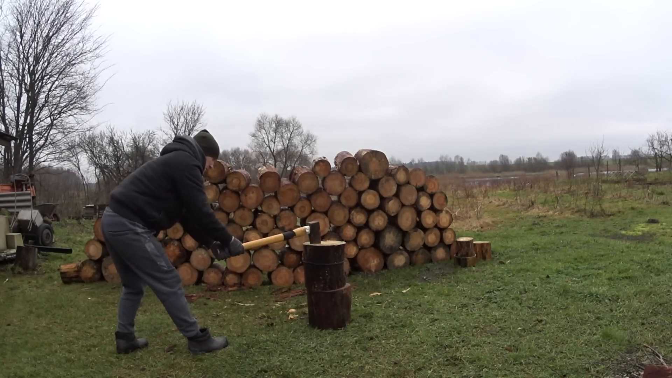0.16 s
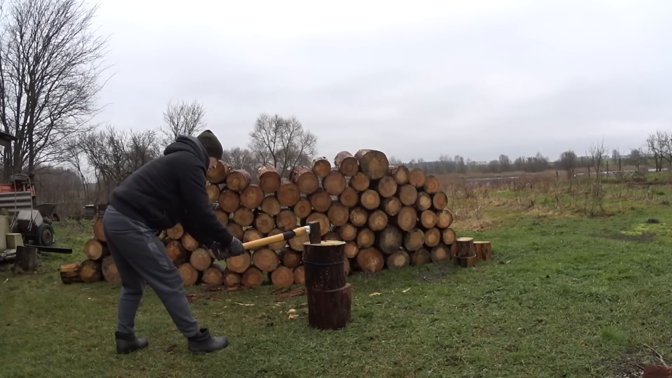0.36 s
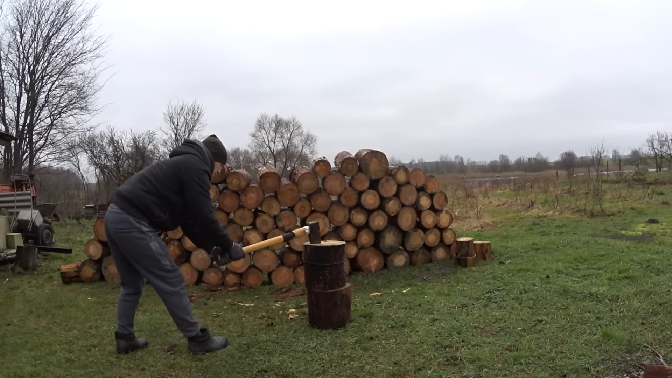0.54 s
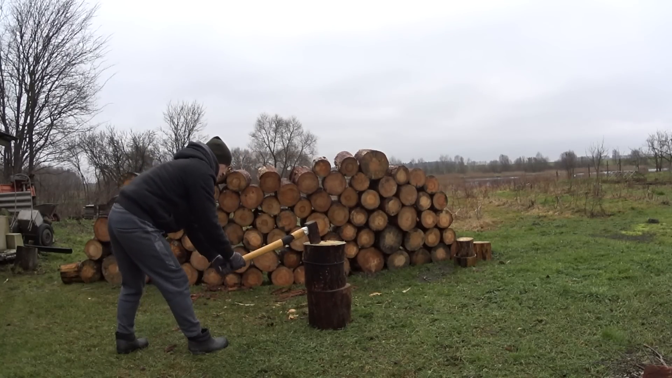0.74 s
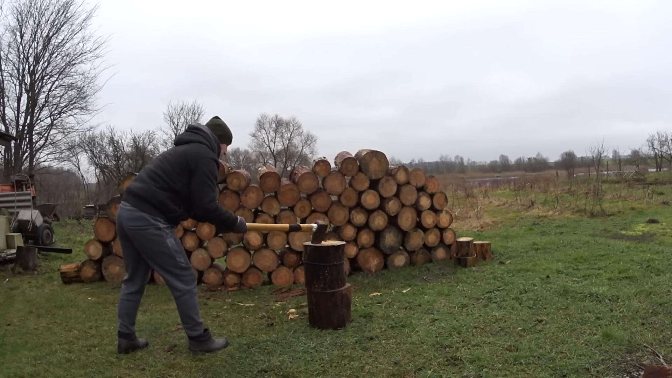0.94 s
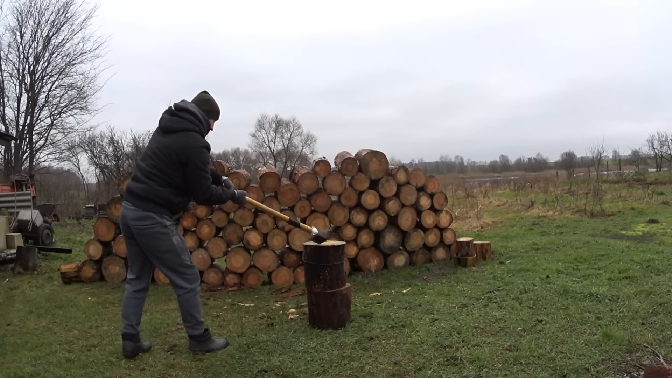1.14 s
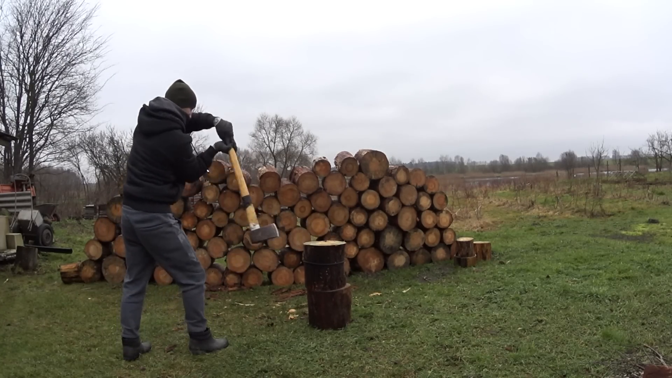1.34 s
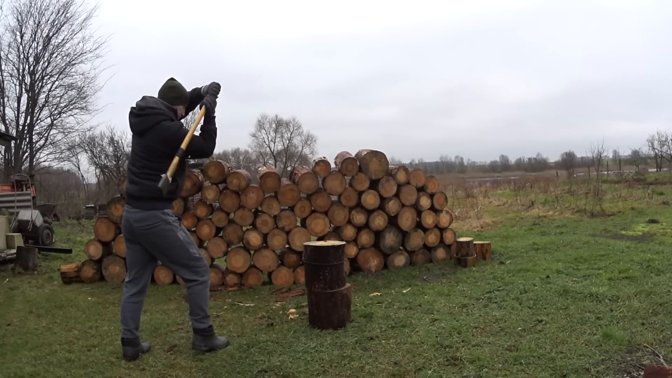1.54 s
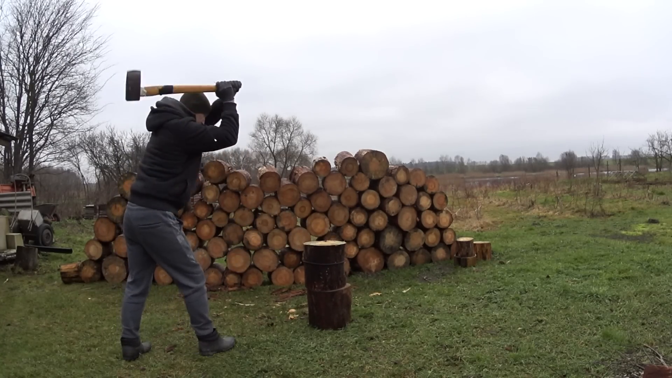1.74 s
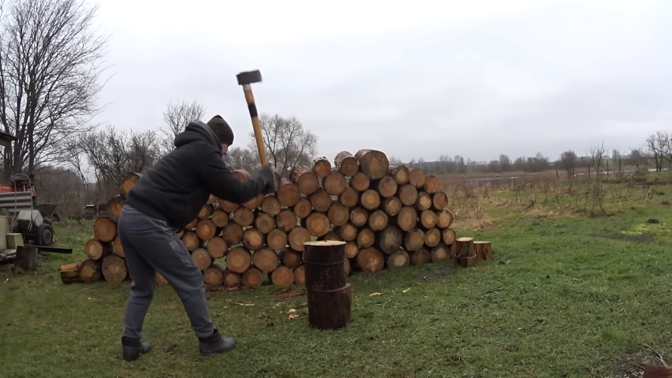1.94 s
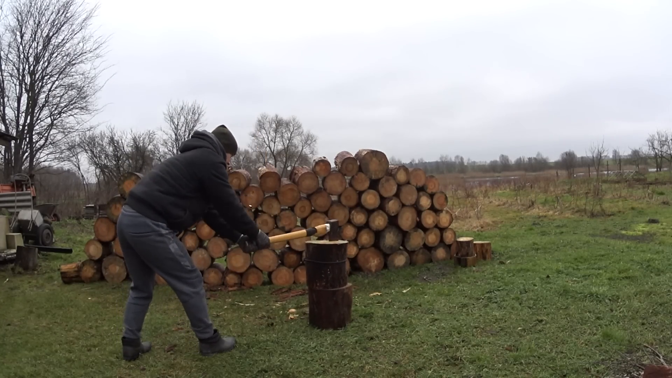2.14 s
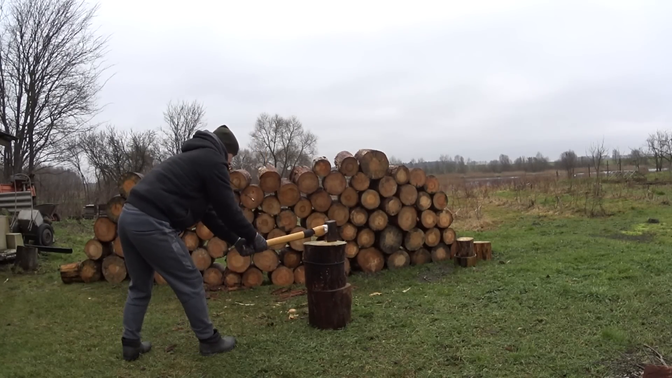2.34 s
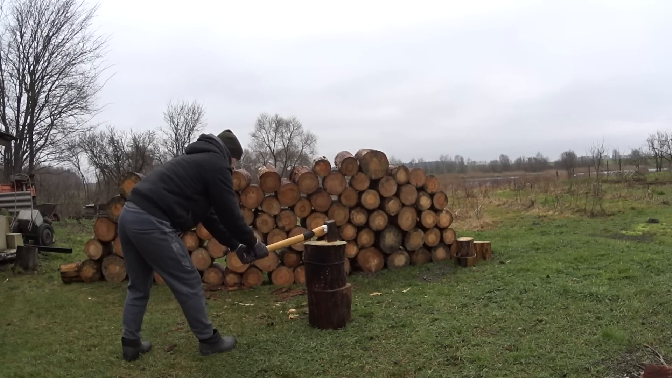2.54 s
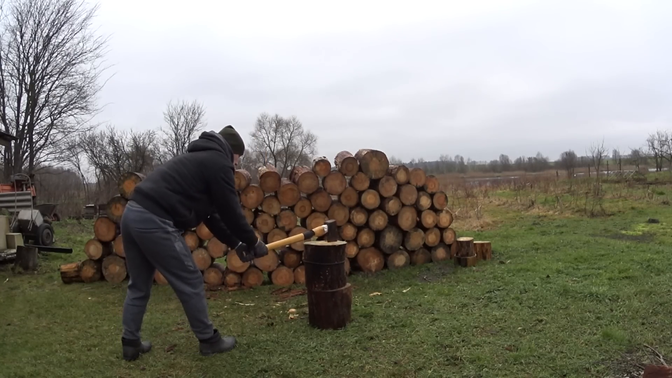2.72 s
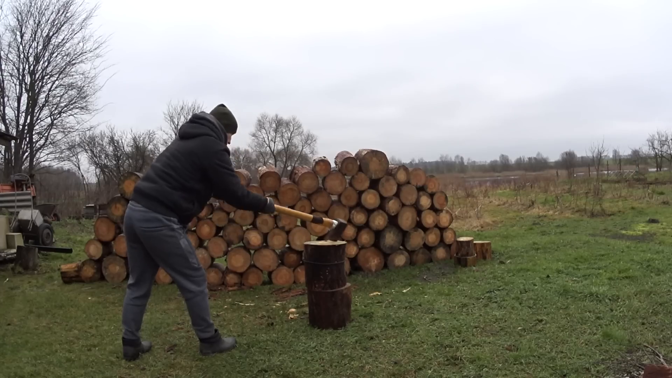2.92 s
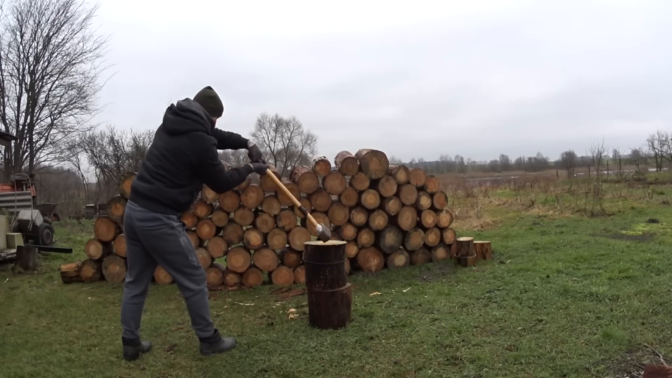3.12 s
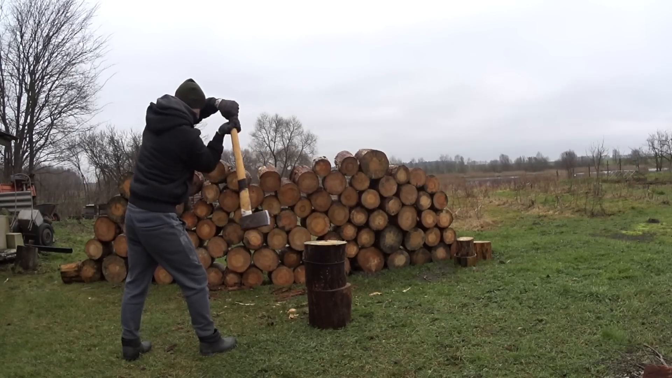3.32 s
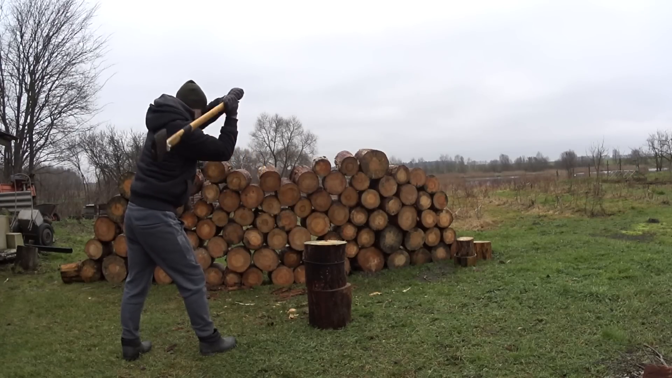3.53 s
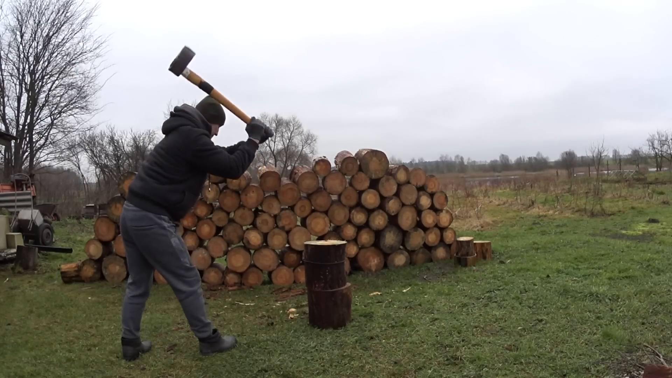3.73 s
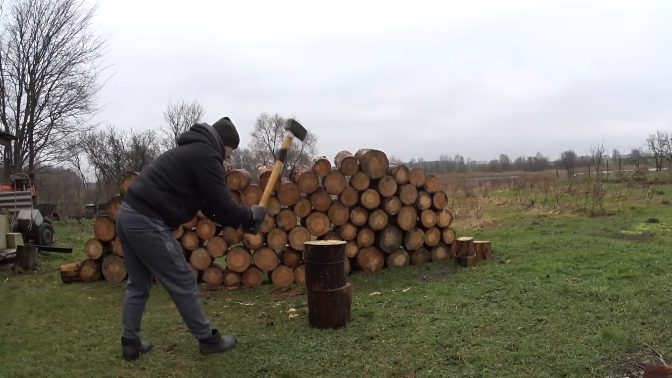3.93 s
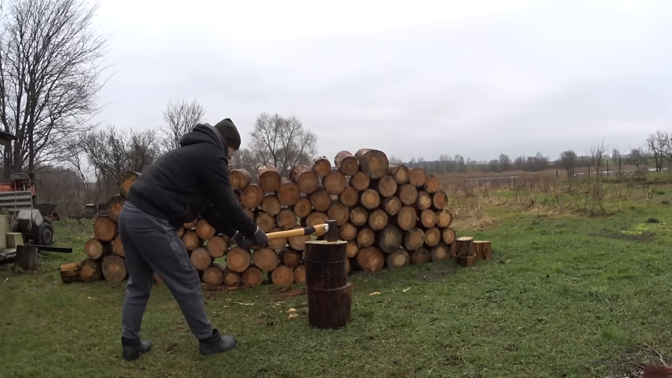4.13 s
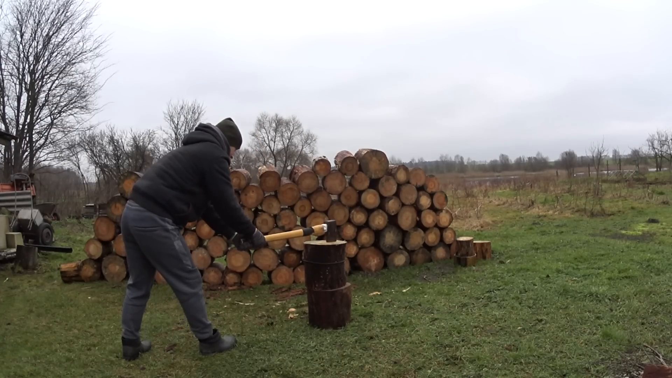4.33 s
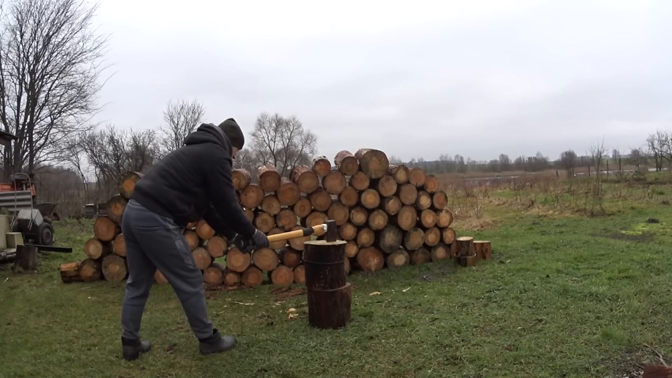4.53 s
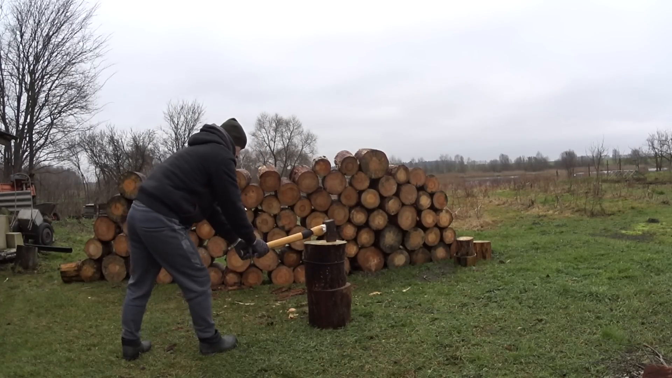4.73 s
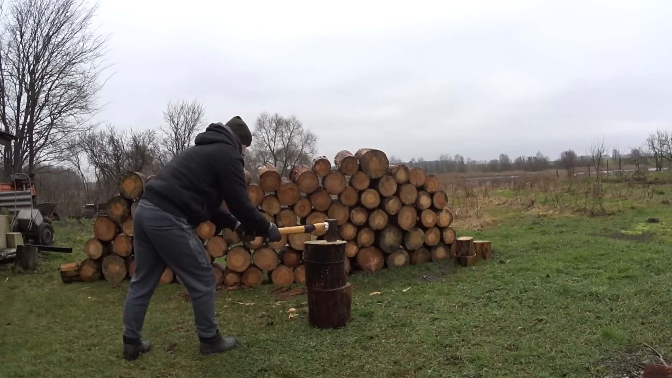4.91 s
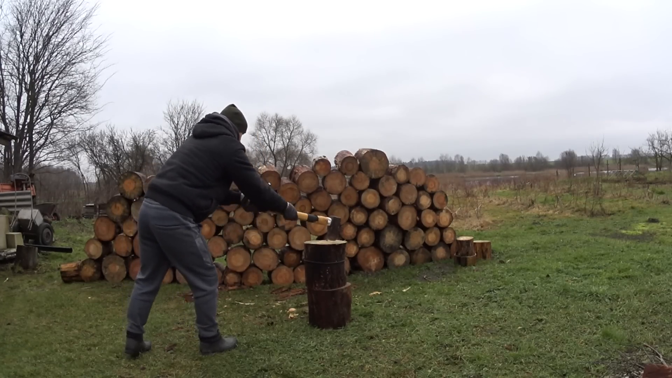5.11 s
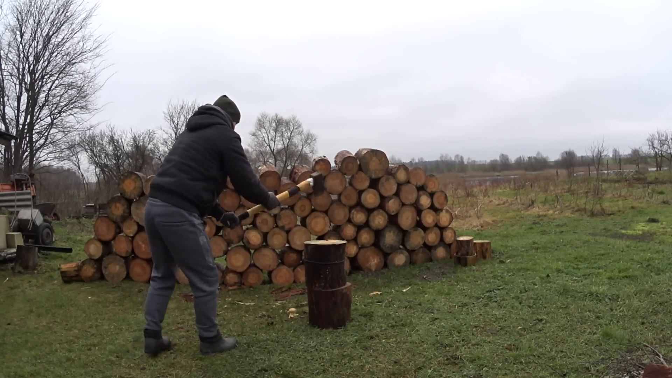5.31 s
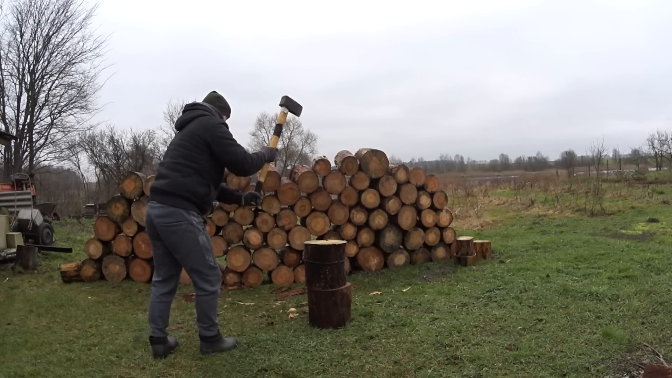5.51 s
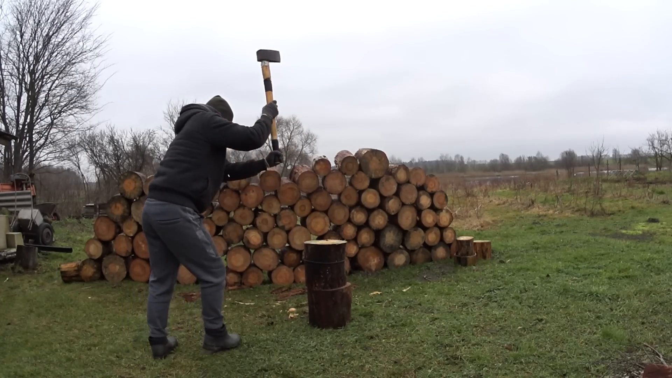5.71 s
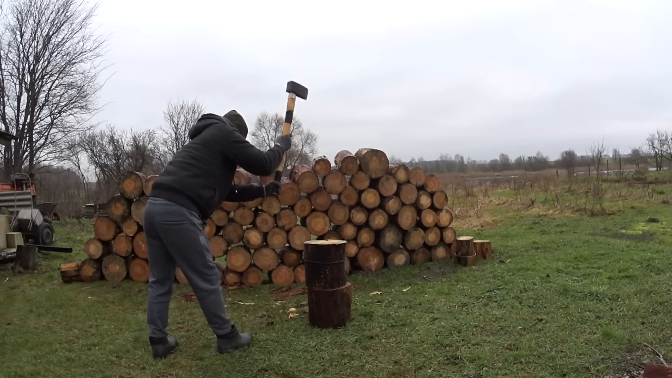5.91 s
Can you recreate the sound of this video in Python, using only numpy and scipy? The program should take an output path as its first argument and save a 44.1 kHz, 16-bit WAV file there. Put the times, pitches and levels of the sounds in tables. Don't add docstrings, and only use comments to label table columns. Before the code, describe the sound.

Three violent wood-chopping blows land about two seconds apart, each a splintering crack with a short hollow ring. A nearby wood pile scatters the sound and distant walls answer with separate fading echoes. Between blows come quiet scrapes, ticks, handle knocks and glove rustle over soft outdoor hush. Close stereo microphone, with the loudest peaks slightly overloaded.

```python
import sys
import numpy as np
from scipy import signal
from scipy.fft import rfft, irfft
from scipy.io import wavfile
from scipy.ndimage import uniform_filter1d

SR = 44100
rng = np.random.default_rng(int(sys.argv[2]) if len(sys.argv) > 2 else 0)


def attenuation_scalar(level_db):
    decades = np.asarray(level_db, float) / 20
    return 10 ** decades


def pcm_store(signal):
    levels = np.round(np.clip(np.atleast_2d(signal), -1, 1) * 32767)
    wavfile.write(sys.argv[1], SR, levels.astype(np.int16).T)


N = 262836


def evened(x):
    return x / np.sqrt(np.mean(x ** 2) + 1e-20)


def read(points, hz):
    f, value = np.transpose(points)
    return np.interp(np.log(hz + 1), np.log(f + 1), value)


def add(mix, s, sound):
    part = mix[..., round(s * SR):][..., :sound.shape[-1]]
    part += sound[..., :part.shape[-1]]


def coloured(x, points):
    gain_db = np.maximum(read(points, abs(np.fft.fftfreq(8192, 1 / SR))), -100)
    log_gain = np.log(attenuation_scalar(gain_db))
    taps = np.fft.ifft(np.exp(np.conj(signal.hilbert(log_gain)))).real[:2048]
    taps = taps.reshape((1,) * (x.ndim - 1) + (-1,))
    return signal.fftconvolve(x, taps, axes=-1)[..., :x.shape[-1]]


def ring(hz, t60_s, size=4000):
    t = np.arange(size) / SR
    return attenuation_scalar(-60 * t / t60_s) * np.sin(2 * np.pi * hz * t)


def band_noise(x, order, low_hz, high_hz):
    return signal.lfilter(*signal.butter(order, [low_hz, high_hz], "band", fs=SR), x)


def panned(db, left_right_db):
    return attenuation_scalar(db + np.array([[.5], [-.5]]) * left_right_db)


def air():
    # f/Hz, density/dB per Hz
    colour = [(25, -44), (50, -40), (62, -3.5), (75, -20.5), (150, -16.5), (240, -12.5), (400, -5.5),
              (600, -2.5), (1500, -3), (2300, -4), (5000, -10.5), (11000, -13)]
    # f/Hz, likeness/0-1
    likeness = [(60, 0.6), (200, .7), (600, 0), (1700, 0.4), (5000, 0.2), (11000, 0.07)]
    level_db, patch_db, lag_s = -56.5, 0.84, .0002
    frames, hz = N // 512 + 5, np.fft.rfftfreq(2048, 1 / SR)
    a, b, c, d, patches = rng.standard_normal((frames, 1025, 5)).T
    patches = evened(uniform_filter1d(uniform_filter1d(patches, 40, 0), 12, 1))
    same = np.clip(read(likeness, hz), -1, 1)[:, None]
    left = a + 1j * b
    lagged = left * np.exp(-2j * np.pi * hz * lag_s)[:, None]
    right = same * lagged + np.sqrt(1 - same ** 2) * (c + 1j * d)
    z = np.array([left, right]) * attenuation_scalar(read(colour, hz)[:, None] + patch_db * patches)
    hush = signal.istft(z, nperseg=2048, noverlap=1536)[1][:, :N]
    return attenuation_scalar(level_db) * hush / np.sqrt(np.mean(hush.mean(0) ** 2))


def swish():
    t = np.arange(-4000, 0) / SR
    wind = band_noise(rng.standard_normal(len(t)), 2, 700, 2500)
    return attenuation_scalar(-53.5) * evened(wind) * np.exp(t / 0.039)


def scatter(decays, same, size, dense):
    a, b = rng.standard_normal((2, size)) * (rng.random((2, size)) < dense)
    sides = np.array([a, same * a + np.sqrt(1 - min(same, 1) ** 2) * b])
    hz, t, z = signal.stft(sides, SR, nperseg=128)
    tail = signal.istft(z * attenuation_scalar(-60 * t / read(decays, hz)[:, None]), SR, nperseg=128)[1]
    return tail / np.linalg.norm(tail[0])


def echo(x, db, smear_s, top_hz, pan_db):
    t = np.arange(2000) / SR
    rough = rng.standard_normal(2000) + 0.34 * rng.standard_normal((2, 2000))
    taps = rough * t * np.exp(-t / smear_s)
    taps = signal.lfilter(*signal.butter(2, top_hz, fs=SR), taps / np.linalg.norm(taps[0]))
    return panned(db, pan_db) * signal.fftconvolve(x[None], taps, axes=1)


def blow(row, wall, colour, modes, pile, yard):
    # delay/s, level/dB, smear/s, left-right/dB
    echoes = [(.011, -10, 0.0047, 1.5), (.024, -14.5, .003, -3), (.04, -20, 0.0035, 4.5),
              (.058, -30, 0.0034, -4), (0.11, -29.5, 0.004, -9), (.127, -23, 0.0067, 2),
              (.16, -33.5, 0.0036, 2.5), (0.189, -47.5, 0.011, -4), (.238, -41, 0.0036, -8.5),
              (.265, -42.5, 0.0051, -4), (.318, -47.5, 0.0056, 5), (.372, -57.5, .005, -5)]
    # f/Hz, gain/dB
    far_colour = [(60, -25), (110, 8), (170, 12), (300, 6), (500, -2), (1500, -4.5), (5000, -6.5),
                  (11000, -10)]
    contact_s, pile_s, yard_s, wall_s = .0073, .0105, .075, .1006
    _, crack_db, ring_db, pile_db, yard_db = row
    wall_crack_db, wall_ring_db, wall_hz = wall
    t = np.arange(6000) / SR

    force = np.clip(t / .003, 0, 1) ** 1.8 * np.exp(-np.maximum(t - contact_s, 0) / 0.0011)
    snaps = rng.standard_normal(len(t)) * attenuation_scalar(3.81 * rng.exponential(1, len(t))) * force
    crack = coloured(snaps, colour)
    crack = crack / abs(crack).max()
    wood = sum(attenuation_scalar(db) * ring(hz, t60, size=len(t)) for hz, db, t60 in modes)
    wood = wood * np.clip(t / 0.004, 0, 1)
    wood = attenuation_scalar(ring_db) * wood / abs(wood).max()
    out = np.zeros((2, SR))
    add(out, 0, attenuation_scalar(crack_db) * crack + wood)

    blur = coloured(1. * (t == 0), colour)
    blurred = attenuation_scalar(crack_db) * blur * np.linalg.norm(crack) / np.linalg.norm(blur)
    add(out, pile_s, attenuation_scalar(pile_db) * signal.fftconvolve((blurred + wood)[None], pile, axes=1))
    far = coloured(blurred, far_colour)
    add(out, yard_s, attenuation_scalar(-20.5 + yard_db) * signal.fftconvolve(far[None], yard, axes=1))

    add(out, wall_s, echo(attenuation_scalar(wall_crack_db) * crack, 0, 0.0028, 9000, 0))
    far_side = np.zeros(len(t))
    for hz, db, t60 in modes:
        favour_db = -6.5 * abs(np.log2(hz / wall_hz))
        far_side += attenuation_scalar(db + favour_db) * ring(hz, t60, size=len(t))
    far_side = far_side / abs(far_side).max() * np.clip(t / 0.0011, 0, 1)
    add(out, wall_s, attenuation_scalar(wall_ring_db) * far_side)

    for delay, db, smear_s, pan_db in echoes:
        heard = blurred + np.exp(-delay / .25) * wood
        top_hz = 10000 * np.exp(-delay / 0.93)
        add(out, delay, echo(heard, db + yard_db, smear_s, top_hz, pan_db))
    return out


def chops():
    # t/s, crack/dB, ring/dB, pile/dB, yard/dB
    blows = [
        (0.1225, 9.5, 1, -6, -1.5),
        (2.1426, 7, -1, -3.5, 5.5),
        (4.1028, 11, -3, -7.5, -3.5),
    ]
    # crack/dB, ring/dB, favoured modes f/Hz
    wall_hears = [
        (-15.5, 0, 590),
        (-14.5, -10, 350),
        (-21.5, -21.5, 390),
    ]
    # f/Hz, density/dB per Hz
    cracks = [
        [(35, -66), (60, -29.5), (118, -27.5), (294, -10), (492, -12.5), (579, -21.5), (715, -6), (882, -5.5),
         (1040, -9.5), (4530, -22), (6000, -22.5), (16000, -61.5)],
        [(35, -56), (60, -33), (308, -9), (636, -17.5), (785, -1.5), (946, -14.5), (1040, -0.5), (2090, -6),
         (2520, -9), (4970, -12), (10300, -29), (16000, -59)],
        [(35, -54), (60, -22.5), (124, -27.5), (308, -8), (417, -10.5), (621, -2), (903, -10), (1410, -1),
         (2770, -10), (3670, -8), (10800, -32.5), (16000, -63.5)],
    ]
    # f/Hz, level/dB, t60/s
    rings = [
        [(196, -18.5, 0.14), (318.9, -14, 0.18), (498, -6, .06), (717, 1, 0.09), (665, -7, .07),
         (888, -8.5, .05), (1800, -5.5, 0.014), (1114, -8, 0.029), (1600, -1, 0.014)],
        [(201.8, -19.5, 0.081), (321, -13.5, .08), (570, -5, 0.03), (647, -8, 0.044), (370, -10, 0.079),
         (1055, 5, 0.046), (1212, -8.5, .05), (2110, -8.5, 0.031), (4804, -11.5, 0.024)],
        [(189.4, -25, 0.05), (408, -9.5, 0.092), (307, -12, .08), (600, -14, 0.067), (952, -4.5, 0.064),
         (1060, 4.5, .045), (1430, -20.5, .05), (1800, -12, 0.026), (3692, -14, 0.045)],
    ]
    # f/Hz, t60/s
    pile_decay = [(100, 0.17), (300, .2), (800, 0.1), (2000, 0.11), (5000, .12), (12000, 0.18)]
    # f/Hz, t60/s
    yard_decay = [(100, .38), (300, .6), (600, 0.55), (1000, .55), (2000, 0.82), (5000, 0.68),
                  (12000, 0.45)]
    # f/Hz, side gain/dB
    width = [(100, -5), (300, -8.5), (700, -3), (1500, 3.5), (3000, 2.5), (6000, 2.5), (12000, 5)]
    # f/Hz, left-right/dB
    balance = [(60, -3.5), (250, -2.3), (1000, 0.56), (4000, 0.6), (15000, 2.7)]
    chop = np.zeros((2, N))
    pile = scatter(pile_decay, .93, size=12000, dense=.25)
    yard = scatter(yard_decay, 0.51, size=36000, dense=.02)
    for row, wall, colour, modes in zip(blows, wall_hears, cracks, rings):
        add(chop, row[0], blow(row, wall, colour, modes, pile, yard))
        add(chop, row[0] - 4000 / SR, swish())

    side = (chop[0] - chop[1]) / 2
    side = irfft(rfft(side) * attenuation_scalar(read(width, np.fft.rfftfreq(N, 1 / SR))), N)
    chop = chop.mean(0) + np.array([[1], [-1]]) * side
    lean = np.array(balance) * [1, .5]
    return np.array([coloured(chop[0], lean), coloured(chop[1], lean * [1, -1])])


def tick(db, low_hz, high_hz, t60_s):
    snap = rng.standard_normal(3000) * attenuation_scalar(-60 * np.arange(3000) / SR / t60_s)
    snap = band_noise(snap, 3, low_hz, high_hz)
    return panned(db, 1.9) * snap / abs(snap).max()


def add_ticks(mix):
    # t/s, peak/dB, low f/Hz, high f/Hz, t60/s
    ticks = [(0.903, -39, 5500, 10500, .012), (1.0911, -36, 401, 2960, .014),
             (1.179, -33.5, 1490, 6000, .014), (1.207, -44, 486, 1490, 0.048),
             (1.286, -33.5, 1400, 4440, .014), (1.365, -43.5, 796, 4000, 0.0074),
             (1.504, -29.5, 1800, 6700, 0.032), (1.511, -34.5, 399, 2000, .04),
             (1.7633, -28, 900, 6500, 0.0037), (1.918, -39.5, 4040, 8460, .015),
             (2.946, -40.5, 1010, 3500, 0.011), (2.968, -36, 3970, 10000, 0.011),
             (2.9738, -39, 2980, 8000, .012), (5.756, -49.5, 300, 675, .0095),
             (5.915, -40.5, 1500, 5990, 0.011), (2.1355, -22, 708.3, 1500, 0.13),
             (4.097, -33.5, 497, 1800, 0.062)]
    for s, *row in ticks:
        add(mix, s, tick(*row))


def rub(peak_s, swell_s, fade_s, db, centre_hz, octaves):
    t = np.arange(-30000, 30000) / SR
    clumps = evened(uniform_filter1d(rng.standard_normal(len(t)), 220))
    grains = rng.standard_normal((2, len(t))) * attenuation_scalar(2.4 * clumps)
    grains = np.array([grains[0], .8 * grains[0] + .6 * grains[1]])
    hz = np.fft.rfftfreq(len(t), 1 / SR)
    bell = np.exp(-abs(np.log2((hz + 1) / centre_hz) / octaves) ** 1.4)
    bell = bell * attenuation_scalar(2.5 * evened(uniform_filter1d(rng.standard_normal(len(hz)), 200)))
    band = irfft(rfft(grains) * bell / np.sqrt((bell ** 2).mean()), len(t))
    return peak_s + t[0], band * attenuation_scalar(db - 25 * np.where(t < 0, -t / swell_s, t / fade_s))


def add_scrapes(mix):
    scrapes = [(1.07, .09, 0.31, -54.5, 1300), (1.211, .22, 0.03, -52.5, 1000),
               (1.52, 0.17, 0.19, -52.5, 950), (1.68, 0.31, .13, -58.5, 1874),
               (2.974, 0.077, 0.033, -56.5, 1005), (3.501, 0.41, 0.42, -75, 1190),
               (4.734, 0.048, .04, -57.5, 1255), (4.95, 0.051, 0.6, -54, 1880),
               (5.084, 0.27, 0.044, -54, 1480), (5.44, 0.064, 0.068, -49, 1193),
               (5.53, 0.13, .12, -63, 1215), (5.75, 0.054, .2, -64, 1320), (5.95, .14, 0.27, -61, 1390),
               (4.24, .08, .3, -64.5, 135), (1.17, .06, .2, -73, 140), (4.399, .2, .2, -57.5, 1500),
               (2.45, 0.23, 0.21, -55.5, 1600)]
    for row in scrapes:
        add(mix, *rub(*row, octaves=1))


def add_thuds(mix):
    # t/s, peak/dB, f/Hz, t60/s
    thuds = [
        (1.5025, -43, 361, .2),
        (1.5125, -47, 300, .15),
        (1.53, -53, 450, .2),
        (1.161, -58, 200, .1),
        (2.9675, -46, 630, .09),
        (2.9675, -52, 1550, .05),
        (5.43, -58, 450, .1),
        (5.04, -60, 680, .15),
    ]
    for s, db, hz, t60_s in thuds:
        onset = np.clip(np.arange(9000) / SR * hz, 0, 1)
        add(mix, s, attenuation_scalar(db) * ring(hz, t60_s, size=9000) * onset)


def add_rumbles(mix):
    rumbles = [
        (1.17, .06, 0.1, -56.5),
        (1.51, 0.062, 0.141, -55.5),
        (1.61, 0.11, 0.13, -59.5),
        (2.974, 0.065, .03, -75),
        (5.44, 0.092, 0.1, -66),
        (5.751, 0.034, .06, -71),
    ]
    for row in rumbles:
        add(mix, *rub(*row, centre_hz=300, octaves=0.54))


def add_cloth(mix):
    slides = [(1.211, 0.3, .07, -64, 0.59), (1.519, 0.12, .2, -45.5, .2), (1.549, 0.41, .3, -50.5, .6),
              (1.63, 0.19, .14, -54, .45), (2.965, 0.044, 0.036, -54, 0.64),
              (4.734, 0.078, 0.098, -61, 0.65), (4.95, 0.11, 0.53, -56.5, 0.64),
              (5.084, 0.23, 0.057, -64, 0.62), (5.44, .07, .07, -57, 0.64), (5.76, .05, 0.043, -57, 0.72),
              (5.93, .1, .3, -61, 0.62)]
    for *row, octaves in slides:
        add(mix, *rub(*row, 5500, np.clip(octaves, .15, 1.5)))


def scene():
    mix = air()
    mix += chops()
    add_ticks(mix)
    add_scrapes(mix)
    add_thuds(mix)
    add_rumbles(mix)
    add_cloth(mix)
    return mix


def roll_off(x):
    return signal.sosfilt(signal.butter(12, 16330, fs=SR, output="sos"), x)


def record(dry):
    edge_hz, overload = 11050, attenuation_scalar(0)
    taps = signal.firwin(601, edge_hz, window=("kaiser", 9), fs=SR)
    low = signal.oaconvolve(dry, taps[None], "same")
    return roll_off(np.clip(low, -overload, overload))


dry = scene()
out = record(dry)
pcm_store(out)
```